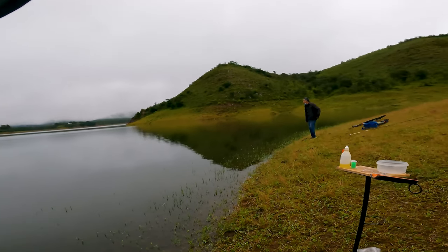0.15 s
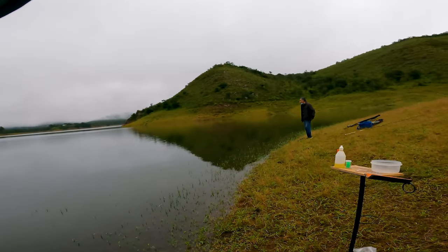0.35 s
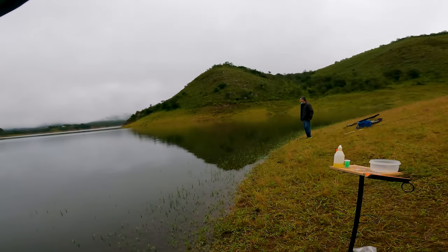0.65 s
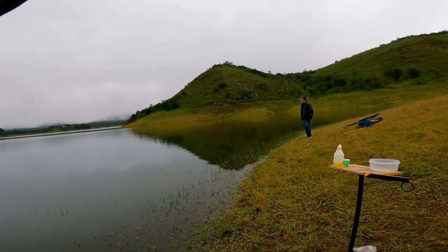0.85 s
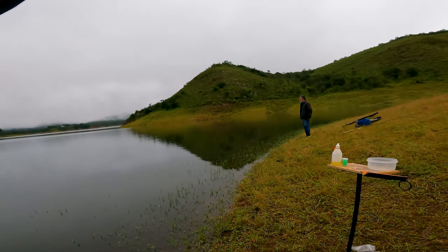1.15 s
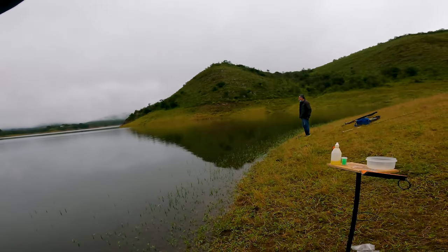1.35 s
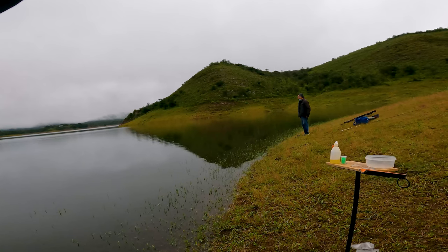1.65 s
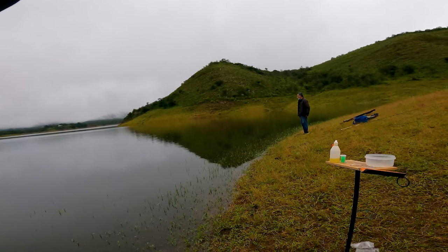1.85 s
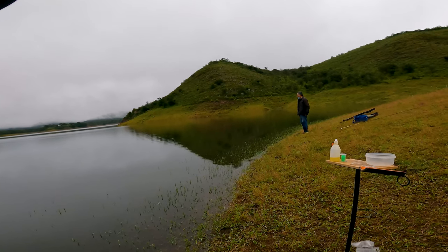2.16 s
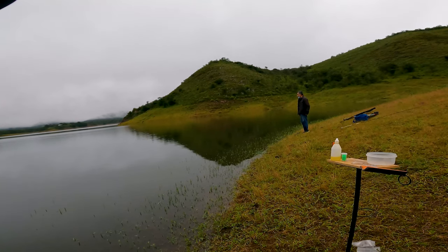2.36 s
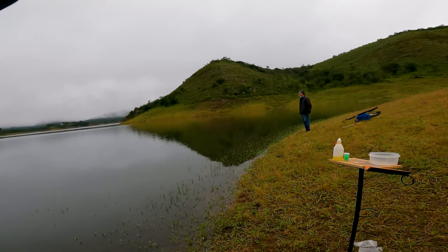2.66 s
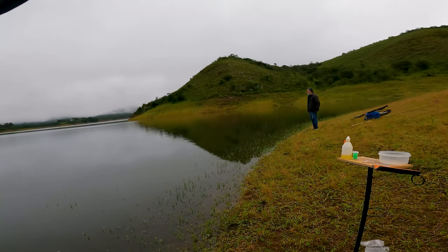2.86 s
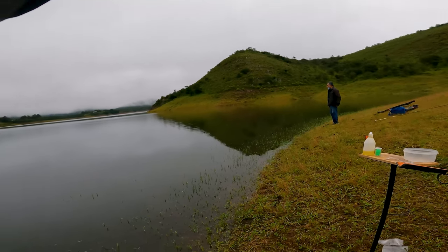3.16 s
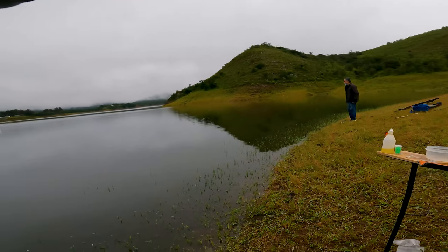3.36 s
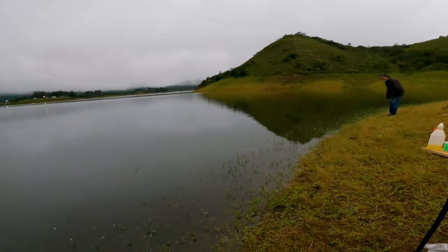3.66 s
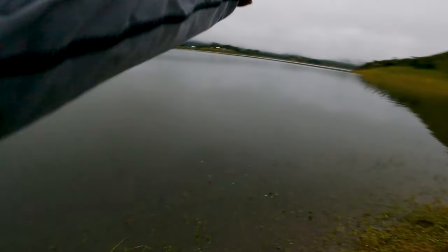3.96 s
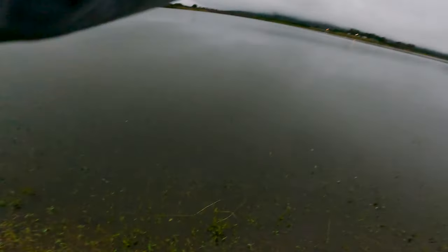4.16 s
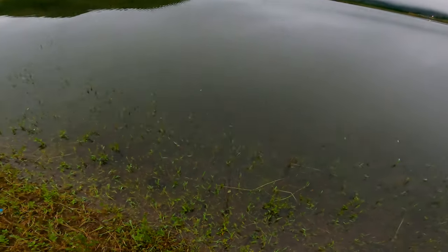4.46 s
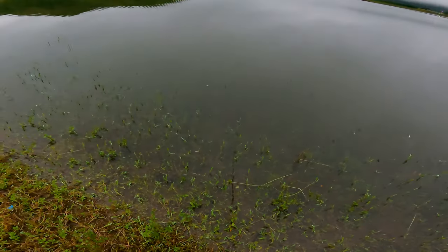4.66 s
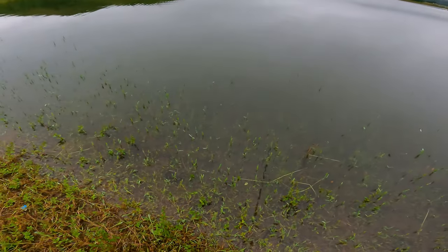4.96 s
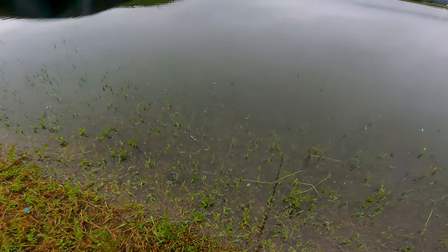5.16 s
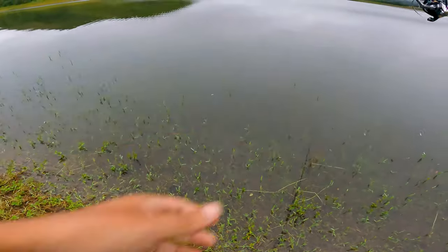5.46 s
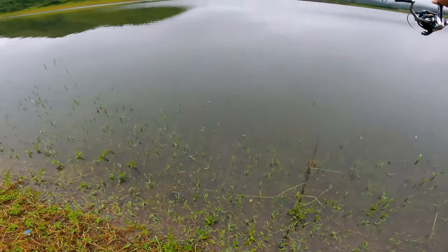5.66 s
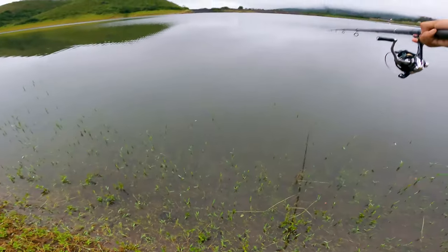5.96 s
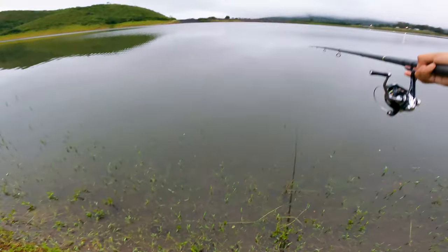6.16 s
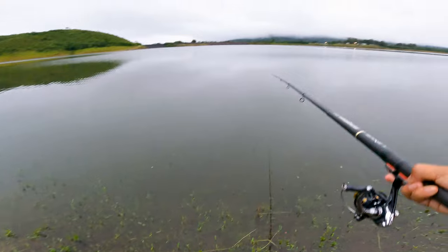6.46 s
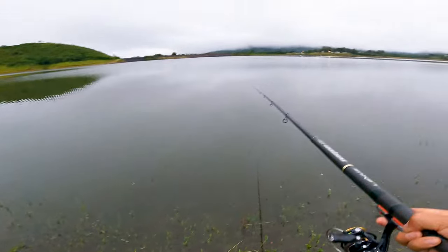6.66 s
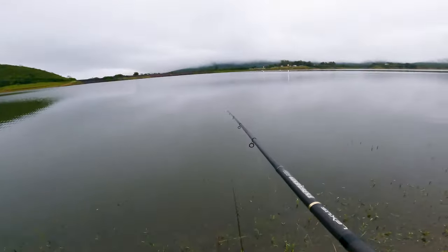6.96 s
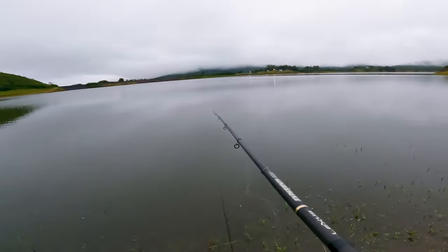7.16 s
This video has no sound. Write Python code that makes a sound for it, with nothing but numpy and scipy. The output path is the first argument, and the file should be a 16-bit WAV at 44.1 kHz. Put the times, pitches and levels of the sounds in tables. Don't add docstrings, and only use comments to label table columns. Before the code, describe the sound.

Crickets trill steadily by a quiet lake as wind bumps the microphone; a rod whips past with a rising swish, then line hisses out.

```python
import sys
import numpy as np
from scipy import signal
from scipy.io import wavfile
from scipy.ndimage import uniform_filter1d, map_coordinates

SR = 44100
rng = np.random.default_rng(int(sys.argv[2]) if len(sys.argv) > 2 else 0)


def boost_factor(decibels):
    exponent = np.asarray(decibels, float) / 20
    return 10 ** exponent


def wav_record(signal):
    frames = np.transpose(np.atleast_2d(signal))
    bounded = np.clip(frames, -1, 1)
    quanta = np.round(bounded * 32767).astype(np.int16)
    wavfile.write(sys.argv[1], SR, quanta)


N = 321914

CAST_S = 4.4
SLACK_S = 7.01


def unit(x):
    return x / np.sqrt(np.mean(x ** 2) + 1e-20)


def along(points, hz):
    f, v = np.transpose(points)
    return np.interp(np.log(hz + 1), np.log(f + 1), v)


def curves(rows, t=None):
    s, *cols = np.transpose(rows)
    if t is None:
        t = np.arange(N) / SR
    return [np.interp(t, s, c) for c in cols]


def during(rows):
    t = np.arange(N) / SR
    return np.clip(np.minimum(t - rows[0][0], rows[-1][0] + .01 - t) / .01, 0, 1)


def wobble(rate):
    coarse = np.arange(0, N + 32, 32)
    knots = rng.standard_normal(int(N * rate / SR) + 6)
    return np.interp(np.arange(N), coarse, map_coordinates(knots, [coarse * rate / SR]))


def swells(rows, tail):
    t = np.arange(0, N + 64, 64) / SR
    s, db, length = np.transpose(rows)[:, :, None]
    x = (2 * (t - s) / length) ** 2
    bells = boost_factor(db) * (.5 ** x + tail * .5 ** (x / 9))
    return np.interp(np.arange(N) / SR, t, bells.sum(0))


def smooth(x, hz, kind):
    return signal.sosfilt(signal.butter(4, hz, kind, fs=SR, output="sos"), x)


def rush(gain, alike, pan_db=0, patchy_db=0, size=256):
    hz, t, z = signal.stft(rng.standard_normal((2, N)), SR, nperseg=size)
    shape = gain(hz[:, None], t) * np.ones(z.shape[1:])
    shape = shape / np.sqrt(np.mean(shape ** 2, 0))
    if patchy_db:
        field = uniform_filter1d(rng.standard_normal(z.shape[1:]), size=5, axis=0)
        field = uniform_filter1d(field, size=12, axis=1)
        shape = shape * boost_factor(patchy_db * unit(field))
    a, b = signal.istft(z * shape, SR, nperseg=size)[1][:, :N]
    turn = np.arccos(np.clip(alike, -1, 1)) / 2
    mid, side = np.cos(turn) * a, np.sin(turn) * b
    return boost_factor([[pan_db / 2], [-pan_db / 2]]) * [mid + side, mid - side]


def coloured(spectrum):
    return lambda hz, t: boost_factor(along(spectrum, hz))


def peaked(rows, column, width):
    return lambda hz, t: 1 / (1 + ((hz / curves(rows, t)[column] - 1) / width) ** 2)


def air_band(rows, width):
    level = boost_factor(curves(rows)[1] + 0.2 + 2.4 * wobble(43))
    return during(rows) * level * rush(peaked(rows, column=0, width=width), 0.81, -0.31, size=512)


def add_at(out, start_s, sound):
    out[:, round(start_s * SR):][:, :sound.shape[-1]] += sound


def hillside(x, t60, db):
    t = np.arange(SR // 2) / SR
    tail = rng.standard_normal((2, len(t))) * boost_factor(-60 * t / t60)
    return x + boost_factor(db) * signal.fftconvolve(x, tail / np.linalg.norm(tail[0]), axes=1)[:, :N]


# time_s, whistle_hz, level_db
ROD_BUTT = [(3.99, 560, -56), (4.012, 750.4, -39), (4.04, 870, -34), (4.056, 1049, -35), (4.067, 1253, -29),
            (4.095, 1631, -31), (4.12, 1853, -34.5), (4.135, 2510, -31.5), (4.148, 3430, -30.5),
            (4.165, 3563, -40)]
# time_s, whistle_hz, level_db
ROD_TIP = [(4.145, 1800, -50), (4.158, 1870, -32), (4.168, 1930, -34), (4.175, 2260, -34),
           (4.183, 1920, -29), (4.197, 1860, -33), (4.22, 1930, -45), (4.25, 1790, -61)]
# time_s, level_db
TORN_AIR = [(3.93, -81), (3.954, -67), (4.03, -63), (4.06, -46), (4.102, -46), (4.156, -29.5), (4.185, -31),
            (4.3, -66), (4.364, -64), (4.5, -72)]
# frequency_hz, level_db
TORN_COLOUR = [(800, -40), (2000, -3.5), (4000, -12), (5000, -1.5), (6200, 1.5), (7300, -11.5),
               (9000, -0.5), (10200, -11), (13000, -14), (15600, -27)]


def rod():
    overtone_db, core_db = -18, -3.5
    puffs_db = 1.6 * wobble(110)
    core = np.sin(2 * np.pi * np.cumsum(curves(ROD_BUTT)[0] * (1 + .06 * wobble(160))) / SR)
    once = peaked(ROD_BUTT, column=0, width=.1)

    def both(hz, t):
        return once(hz, t) + boost_factor(overtone_db) * once(hz / 2, t)

    butt = rush(both, 0.95, -1.8) + boost_factor(core_db) * core
    butt = during(ROD_BUTT) * boost_factor(curves(ROD_BUTT)[1] + puffs_db) * butt
    tip = rush(peaked(ROD_TIP, column=0, width=0.03), 0.89, -3.5)
    tip = during(ROD_TIP) * boost_factor(curves(ROD_TIP)[1] + 1.2 * wobble(180)) * tip
    whistle = butt + tip
    whistle[0] = np.roll(whistle[0], shift=4)
    torn_level = during(TORN_AIR) * boost_factor(curves(TORN_AIR)[0] - 2 + 0.73 * wobble(150))
    return whistle + torn_level * rush(coloured(TORN_COLOUR), 0.69, 1.0, 2.1)


# start_s, peak_db
RING_TICKS = [(3.99, -33), (4.006, -32), (4.016, -29), (4.024, -31), (4.03, -29), (4.036, -30),
              (4.042, -30), (4.051, -32), (4.224, -31)]


def ticks():
    out, t = np.zeros((2, N)), np.arange(SR // 100) / SR
    for s, db in RING_TICKS:
        click = rng.standard_normal(len(t)) + .5 * rng.standard_normal((2, len(t)))
        add_at(out, s, boost_factor(db - 60 * t / .004) * click)
    body = smooth(smooth(out, 4800, "high"), 9500, "low")
    return body + boost_factor(-17) * smooth(out, 10500, "high")


# time_s, coils_per_s, slap_tone_db
COILS = [(4.3, 290, -95), (4.55, 265, -61.5), (4.7, 239, -58), (5, 202, -63), (5.28, 194, -61.5),
         (5.45, 180, -86), (6.1, 160, -76), (6.7, 210, -71), (7.21, 196, -81)]
# time_s, centre_hz, gain_db
LINE_PULL = [(4.3, 12000, -0.5), (5.6, 12000, 0.5), (5.92, 11700, 2.5), (6.1, 12000, 0.5),
             (6.35, 12200, -1.5), (6.5, 12000, 1.5), (6.66, 11800, 1), (6.74, 11100, 2.5),
             (6.9, 11800, 1.5), (7.01, 11900, 2)]


def spool():
    (rate, tone_db), t = curves(COILS), np.arange(N) / SR
    slack = np.clip(t - SLACK_S, 0, None)
    turn = 2 * np.pi * np.cumsum(rate * (1 + .018 * wobble(60))) / SR
    hum = boost_factor(tone_db + 1.8 * wobble(25)) * np.sin(turn) * boost_factor([[-1.5], [1.5]])
    drag = boost_factor(1.1 * wobble(40) + .7 * wobble(12)) * (1 + .25 * np.sin(turn))
    hiss_db = -65 + 3.5 * (t - COILS[0][0]) + curves(LINE_PULL)[1]
    hiss_db -= 73 * slack
    hiss_db -= 300 * np.clip(t - LURE_PLOP[0] + 0.019, 0, None)

    def lip_and_ring(hz, s):
        centre = curves(LINE_PULL, s)[0] * .5 ** (7.6 * np.clip(s - SLACK_S, 0, None))
        lip = 1 / (1 + ((hz / centre - 1) / np.where(hz < centre, 0.2, 0.11)) ** 2)
        ring = (s < SLACK_S) / (1 + ((hz / 11460 / 0.663 - 1) / 0.093) ** 2)
        return lip + boost_factor(-13) * ring

    hiss = boost_factor(hiss_db) * drag * rush(lip_and_ring, 0.64, 0.46)
    return during(COILS) * (hum + hiss)


# middle_s, peak_db, pitch_hz, cycles, left_right_db
AIR_PUSHES = [(3.931, -32, 176, 3.3, -9.5), (3.978, -23, 166, 2.4, -10), (4.04, -29, 104, 2.2, -4),
              (4.1728, -17.5, 196, 1.6, -6), (6.893, -31.5, 70.6, 1.8, -7)]
# middle_s, peak_db, pitch_hz, cycles, left_right_db
WHIP_GUST = (4.1842, -8, 165, 2.2, -10)


def pushes():
    out = np.zeros((2, N + SR))
    t = np.arange(-SR // 20, SR // 20) / SR
    for s, db, hz, cycles, pan_db in AIR_PUSHES + [WHIP_GUST]:
        lean = np.where(t < 0, 1.7, .9)
        push = -boost_factor(db) * np.exp(-(3.4 * t * hz / cycles / lean) ** 2)
        push = push * np.cos(2 * np.pi * hz * t * (1 - 0.081 * hz * t))
        both = np.array([boost_factor(pan_db) * np.roll(push, shift=-95), push])
        out[:, round(s * SR) - SR // 20:][:, :len(t)] += both
    return smooth(out[:, :N], 11000, "low")


# start_s, peak_db, ring_hz,
# t60_s
SMALL_KNOCKS = [(3.473, -32, 5370, 0.0055), (5.286, -49, 1110, 0.083), (5.293, -56, 1230, 0.042),
                (5.299, -49, 1120, 0.075), (5.321, -42.5, 2480, 0.038), (5.398, -53.5, 1444, 0.15),
                (5.405, -46, 3060, 0.024), (7.201, -44.5, 307, 0.12), (7.208, -53, 1850, 0.025),
                (7.213, -53, 1585, 0.04), (7.226, -54, 1040, 0.064), (7.26, -45, 230, 0.04),
                (7.28, -42.5, 2380, 0.015), (7.281, -44, 400, 0.058)]


def knocks():
    out, t = np.zeros((2, N + SR)), np.arange(SR // 8) / SR
    for s, db, hz, t60 in SMALL_KNOCKS:
        contact = boost_factor(-60 * t / 0.0058) * rng.standard_normal((2, len(t)))
        ring = np.sin(2 * np.pi * hz * t) + contact
        add_at(out, s, boost_factor(db - 60 * t / t60) * (1 - np.exp(-t / 0.00074)) * ring)
    return smooth(out[:, :N], 11000, "low")


# start_s, peak_db, start_hz, end_hz, length_s
LURE_PLOP = (7.2115, -34, 235, 335, .034)


def plop():
    out, t = np.zeros((2, N + SR)), np.arange(SR // 8) / SR
    s, db, low_hz, high_hz, length = LURE_PLOP
    bubble = np.sin(2 * np.pi * (low_hz * t + (high_hz - low_hz) * t * t / (2 * length)))
    swell = (1 - np.exp(-t / 0.0014)) * np.exp(-(t / (0.66 * length)) ** 2)
    add_at(out, s, boost_factor(db) * swell * bubble)
    return smooth(out[:, :N], 11000, "low")


# time_s, centre_hz, level_db
LURE_FLIGHT = [(4.28, 605, -82), (4.36, 650, -57), (4.42, 516, -60), (4.46, 630, -54), (4.54, 800, -65.5),
               (4.64, 770, -64.5), (4.8, 720, -71), (5.0, 730, -79)]


def lure():
    return air_band(LURE_FLIGHT, 0.07)


# time_s, centre_hz, level_db
SLEEVE_AIR = [(3.22, 1175, -87), (3.3, 1310, -76), (3.4, 1280, -70.5), (3.5, 1270, -73), (3.7, 1220, -74)]
# time_s, centre_hz, level_db
SCUFF_SCRAPE = [(3.49, 4800, -60), (3.53, 6000, -62), (3.56, 6400, -62), (3.59, 5300, -61),
                (3.64, 4900, -61), (3.7, 5200, -69)]


def sleeve():
    return air_band(SLEEVE_AIR, 0.12) + air_band(SCUFF_SCRAPE, 0.16)


# time_s, cloth_rub_db
ARM_EFFORT = [(3.2, -90), (3.35, -71), (3.55, -75), (3.72, -63.5), (3.9, -65), (4.02, -47), (4.06, -46),
              (4.16, -40), (4.23, -45), (4.31, -53.5), (4.45, -58), (4.95, -67.5), (5.2, -66.5),
              (5.31, -59.5), (5.5, -64.5), (5.92, -70), (6.25, -63), (6.9, -63.5), (7.1, -73)]
# time_s, level_db
CLOTH_SCUFF = [(3.468, -57), (3.48, -69), (3.51, -64), (3.545, -57), (3.6, -66), (3.66, -70)]
# start_s, length_s, level_db
SLEEVE_SETTLES = [
    (7.208, 0.051, -66),
    (7.283, 0.046, -62.5),
]
# middle_s, peak_db, length_s
SLEEVE_WHIP = [(4.185, -42, 0.04)]
# middle_s, peak_db, length_s
CLOTH_FOLD = [(5.1, -62.5, 0.12)]
# frequency_hz, level_db
SWISH_COLOUR = [(250, -5), (400, 5), (700, 4.5), (900, -1), (1300, -6.5), (3000, -46)]
RUB_COLOUR = [(500, -61), (900, -11), (1150, -3.5), (1500, -5), (2000, -8.5), (2500, -5.5), (2950, -11),
              (4200, -14), (6000, -29), (9000, -59)]
RUSTLE_COLOUR = [(1500, -13), (2800, -9), (3800, -9.5), (4800, -6), (6500, -5), (9000, -8), (13000, -16),
                 (15500, -22)]


def jacket():
    effort_db, t = curves(ARM_EFFORT)[0], np.arange(N) / SR
    settle = swells([(s + length / 2, db, length) for s, length, db in SLEEVE_SETTLES], tail=0)
    fibres = boost_factor(0.86 * wobble(25) + 1.7 * wobble(300))
    swish_db = -65 + 2.12 * (np.minimum(effort_db, -55.5) + 59.0)
    swish = boost_factor(swish_db + 2 * wobble(12)) + boost_factor(-2.0) * settle + swells(SLEEVE_WHIP, tail=0.15)
    low = swish * rush(coloured(SWISH_COLOUR), 0.79, -1.1, 2.17, size=512)
    low = low + (boost_factor(effort_db) + settle) * rush(coloured(RUB_COLOUR), 0.37, 0.11, 2.1)
    creasing_db = -67.5 - 8.5 * (t < CAST_S) + 1.2 * wobble(4.31)
    creasing_db -= 34 * np.clip(t - SLACK_S, 0, None)
    creasing = boost_factor(creasing_db) * during([(CLOTH_SCUFF[0][0],), (N / SR,)])
    rustle = boost_factor(-63 + 1.08 * (effort_db + 60.5))
    scuff = during(CLOTH_SCUFF) * boost_factor(curves(CLOTH_SCUFF)[0])
    bright = creasing + swells(CLOTH_FOLD, tail=0) + rustle + scuff
    bright = bright * rush(coloured(RUSTLE_COLOUR), 0.34, 0.12, 1.77)
    return (t > ARM_EFFORT[0][0]) * fibres * (low + bright)


# middle_s, peak_db, length_s
PORT_GUSTS = [(.148, -60, 0.041), (.5, -64.5, 0.13), (.617, -52, 0.02), (.76, -67.5, 0.17),
              (.979, -54, 0.052), (1.264, -54, 0.16), (1.443, -47.5, 0.017), (1.724, -45.5, 0.056),
              (1.778, -34, 0.01), (1.821, -31.5, 0.013), (1.897, -37.5, 0.04), (2.005, -33.5, 0.045),
              (2.343, -40, 0.091), (2.45, -49, 0.061), (2.536, -40, 0.044), (2.579, -34, 0.011),
              (2.658, -41.5, 0.045), (2.772, -39.5, 0.077), (2.961, -64.5, 0.12), (3.365, -54.5, 0.06),
              (3.489, -45.5, 0.056), (3.75, -52.5, 0.13), (4.06, -41, 0.12), (4.2, -51, 0.14),
              (4.38, -61, 0.16), (5.38, -61, .14), (5.79, -65, 0.27), (6.25, -76, 0.14), (6.8, -59, 0.2),
              (7.17, -70, 0.28)]
# middle_s, peak_db, length_s
PORT_EDDIES = [(1.07, -68, 0.043), (1.24, -71.5, 0.06), (1.82, -56.5, 0.022), (1.89, -69, 0.028),
               (2.0, -52.5, 0.022), (2.32, -72, 0.027), (3.72, -59.5, 0.081), (4.09, -45.5, 0.061),
               (4.33, -56, 0.17), (5.4, -66, 0.38), (5.76, -68, 0.11), (6.1, -54.5, 0.023),
               (6.35, -61.5, 0.17), (6.88, -60.5, 0.49), (7.17, -56, 0.059)]
# frequency_hz, level_db
BUFFET_COLOUR = [(15, -42), (25, -8.5), (59, 4), (87, 0.5), (166, -27), (216, -19.5), (257, -58),
                 (400, -25), (520, -103), (880, -120)]
FLUTTER_COLOUR = [(90, -56.5), (140, 14), (220, -4), (350, -14.5), (700, -26.5)]


def wind():
    gusts, effort_db = swells(PORT_GUSTS, tail=0.058), curves(ARM_EFFORT)[0]
    eddies = rush(coloured(BUFFET_COLOUR), 0.93, -5.0, size=2048)
    steady = eddies / np.sqrt(np.abs(uniform_filter1d(eddies[1] ** 2, size=1100)) + .05)
    buffet = smooth(gusts * boost_factor(3.5 + 0.79 * wobble(21.8)) * steady, 171, "low")
    buffet = buffet + boost_factor(-86 + 2.9 * wobble(14)) * eddies
    buffet[0] = np.roll(buffet[0], shift=2)
    stirred = boost_factor(-72) + swells(PORT_EDDIES, tail=0)
    stirred = stirred + boost_factor(-52) * gusts + boost_factor(np.minimum(effort_db, -56) - 10)
    flutter = stirred * boost_factor(1.03 * wobble(30) + 0.42 * wobble(9.0))
    flutter = flutter * rush(coloured(FLUTTER_COLOUR), 0.18, -5.5, size=1024)
    return smooth(buffet + flutter, 830, "low")


# start_s, chirps, strokes_in_last_chirp
NEAR_PHRASES = [(-.0307, 13, 5), (.9917, 12, 5), (1.9365, 2, 5), (2.1073, 1, 5), (2.2, 2, 4),
                (2.3711, 2, 5), (2.5412, 1, 4), (2.6337, 2, 5), (2.8037, 2, 5), (2.9761, 2, 5),
                (3.1461, 2, 5), (3.3172, 2, 5), (3.4882, 2, 5), (3.6592, 2, 5), (3.8289, 1, 5)]
# time_s, strokes_so_far
TRILL_COUNT = [(0, 0), (.1615, 11), (.3372, 22), (.5591, 34), (1.242, 69), (1.938, 104), (2.001, 108),
               (2.6226, 152), (3.0393, 181), (3.2193, 193), (3.3355, 200), (3.4794, 208), (3.7859, 224),
               (7.3, 415)]
# time_s, gain_db
BODY_SHADE = [(0, 1), (3.4, 0), (3.5, 2.5), (3.75, 2.5), (3.9, -5.5), (4.1, -7), (4.6, -12.5), (7, -33),
              (7.3, -13)]
# left_lag_s, left_right_db
NEAR_PLACE = (1.2e-5, -7.5)
TRILL_PLACE = (3e-5, .6)


def strokes(times, sizes_db, top_hz, fall_hz, length, overtone_db, side):
    lag, pan_db = side
    out = np.zeros((2, N + SR))
    overtone = boost_factor([[overtone_db - pan_db], [overtone_db]])
    t = np.arange(int(length * SR)) / SR - np.array([[lag], [0]])
    swell = np.sin(np.pi * np.clip(t / length, 0, 1) ** .8)
    for s, db, (u, v) in zip(times, sizes_db, rng.standard_normal((len(times), 2))):
        turn = 2 * np.pi * ((top_hz + 40 * u) * t - fall_hz * t * t / (2 * length)) + 9 * v
        add_at(out, s, boost_factor(db + 1.1 * u) * swell * (np.sin(turn) + overtone * np.sin(2 * turn)))
    return out[:, :N] * boost_factor([[pan_db], [0]])


def crickets():
    chirp_s, stroke_s, phrase_s, usual_strokes = .0775, .015, .1705, 4
    shade_db, = curves(BODY_SHADE)
    later_s = np.arange(NEAR_PHRASES[-1][0] + chirp_s * 6 / 5, N / SR - phrase_s, phrase_s)
    later = [(s, 2, usual_strokes + 1) for s in later_s]
    chirps = []
    for s, count, last in NEAR_PHRASES + later:
        for c in range(count):
            start = s + c * chirp_s
            for k in range(last if c == count - 1 else usual_strokes):
                if start + k * stroke_s >= 0:
                    chirps.append((start + k * stroke_s, -5 * 0.71 ** k))
    near = strokes(*np.transpose(chirps), top_hz=5700, fall_hz=1050, length=.0069,
                   overtone_db=-25, side=NEAR_PLACE)
    times, done = np.transpose(TRILL_COUNT)
    trills = np.interp(np.arange(done[-1]), done, times)
    second = strokes(trills, -1.5 * trills, top_hz=5368, fall_hz=800, length=0.0074,
                     overtone_db=-30, side=TRILL_PLACE)
    pair = boost_factor(-45 + shade_db) * near + boost_factor(-48.5 - 1.1 * np.abs(shade_db)) * second
    chorus = rush(lambda hz, t: 1 / (1 + ((hz - 5100) / 420) ** 4), 0.44, -2.5) * boost_factor(2.0 * wobble(70))
    chorus_db = -71 + 2.1 * (np.arange(N) / SR > CAST_S) + 1.8 * wobble(0.9)
    return hillside(pair, .03, -16) + boost_factor(chorus_db) * chorus


# start_s, length_s, level_db
BIRD_CALLS = [
    (1.119, .3, -78),
    (3.632, 0.31, -69.5),
    (5.317, .295, -65.5),
]
# share_of_length, pitch_hz, level_db
FALLING_WHISTLE = [(0, 4870, -8), (.06, 4580, -2), (.14, 4260, -5), (.27, 3900, 3), (.4, 3720, -1),
                   (.7, 3390, 0.5), (.85, 3190, -7), (.96, 2800, -11), (1, 2740, -16)]
# start_s,
# length_s, first_hz, last_hz, level_db
SHORT_NOTES = [(.2, .07, 1780, 1650, -90), (.887, .028, 4200, 3800, -79), (1.065, .04, 4150, 3750, -81),
               (1.83, .11, 4000, 3280, -86), (2.035, .05, 1880, 1640, -81), (5.66, .04, 3500, 3200, -78),
               (7.15, .04, 4600, 4100, -66)]
# time_s, pitch_hz, level_db
ARCHED_CHIRP = [(1.495, 3830, -83), (1.512, 4150, -79), (1.525, 4450, -76), (1.545, 4530, -76),
                (1.562, 4280, -81), (1.58, 3950, -83)]
# time_s, pitch_hz, level_db
FAR_TWITTER = [(.97, 3770, -90), (1.03, 3740, -85), (1.21, 3700, -84), (1.25, 3600, -89)]


def birds():
    out, unsteady_db = np.zeros(N), 1.3 * wobble(45)
    songs = [ARCHED_CHIRP, FAR_TWITTER]
    for s, length, level in BIRD_CALLS:
        songs.append([(s + share * length, hz, db + level) for share, hz, db in FALLING_WHISTLE])
    for s, length, first, last, db in SHORT_NOTES:
        songs.append([(s, first, db - 4), (s + length, last, db - 4)])
    for rows in songs:
        hz, db = curves(rows)
        note = (48 * np.arange(N) / SR) % 1 if rows is FAR_TWITTER else .5
        level = during(rows) * np.sin(np.pi * note) ** 2 * boost_factor(db + 5.5 + unsteady_db)
        out += level * np.sin(2 * np.pi * np.cumsum(hz * (1 + .08 * (.5 - note))) / SR)
    return hillside(out[None], .4, -15)


# frequency_hz, level_db
SHORE_COLOUR = [(120, -43), (200, -2), (525, -13.5), (1200, -12.5), (2500, -20.5), (3900, -20), (4750, 3.5),
                (5600, -17), (6300, -15.5), (8500, -24), (11000, -25.5), (12600, -38), (13300, -70),
                (15500, -90)]


def shore():
    return boost_factor(-69) * rush(coloured(SHORE_COLOUR), 0.092, -1.8, 2.05, size=512)


def scene():
    cast = rod() + ticks() + spool() + pushes() + knocks() + plop() + lure()
    clothes = sleeve() + jacket()
    return cast + clothes + wind() + crickets() + birds() + shore()


def top_cut(x):
    return signal.sosfilt(signal.butter(12, 15730, fs=SR, output="sos"), x)


def record(dry):
    mix = smooth(smooth(dry, 40.4, "high"), 14600, "low")
    return top_cut(mix)


dry = scene()
out = record(dry)
wav_record(out)
```